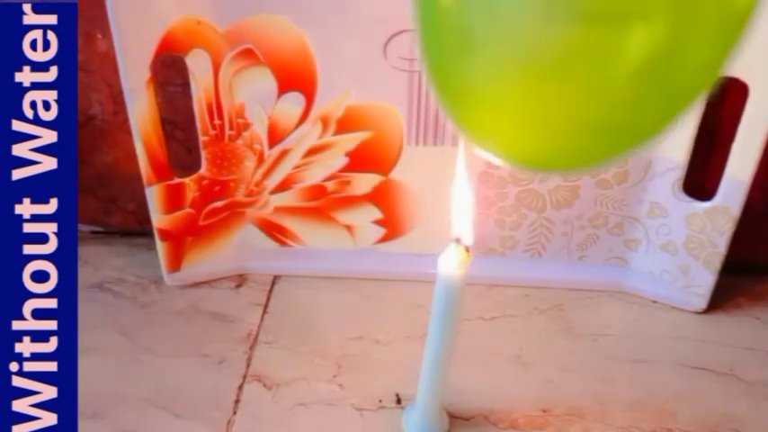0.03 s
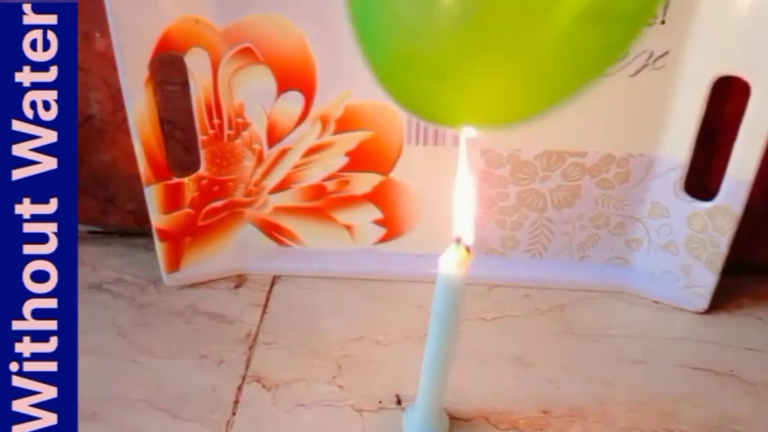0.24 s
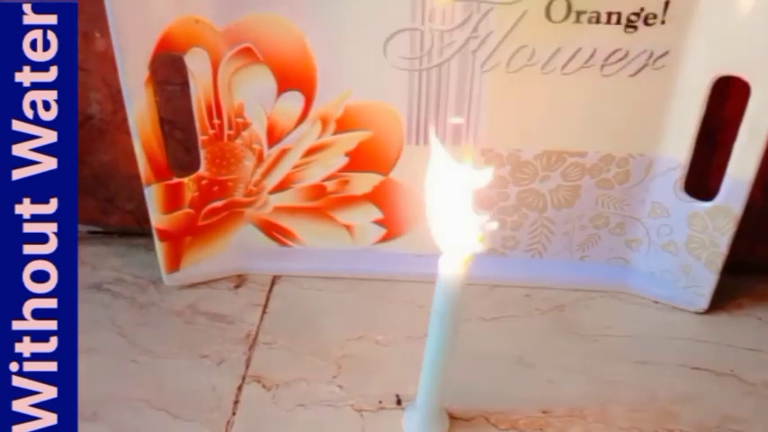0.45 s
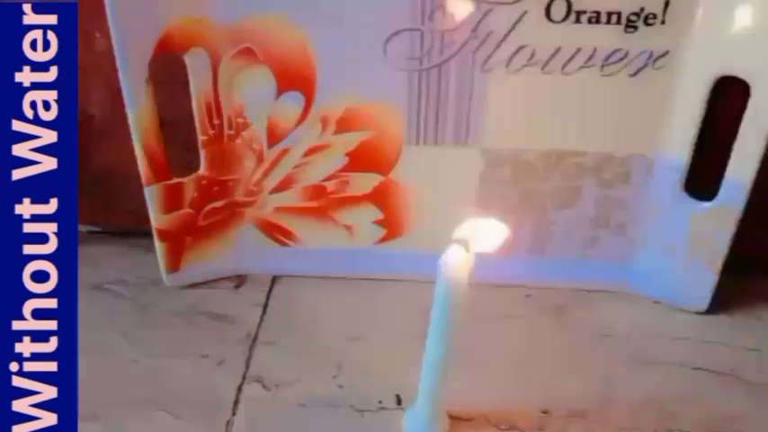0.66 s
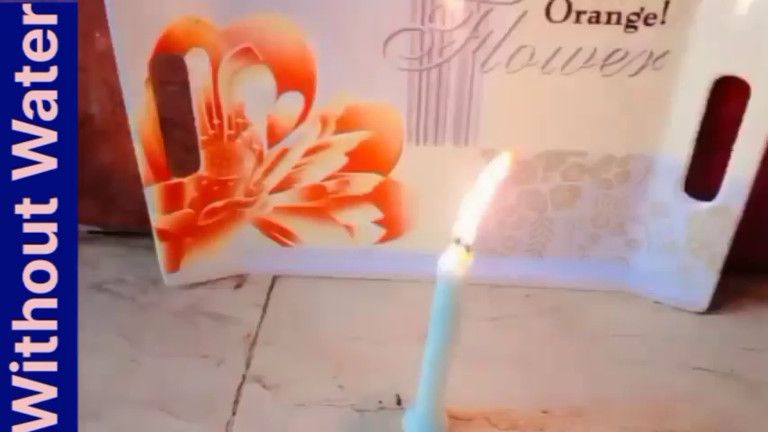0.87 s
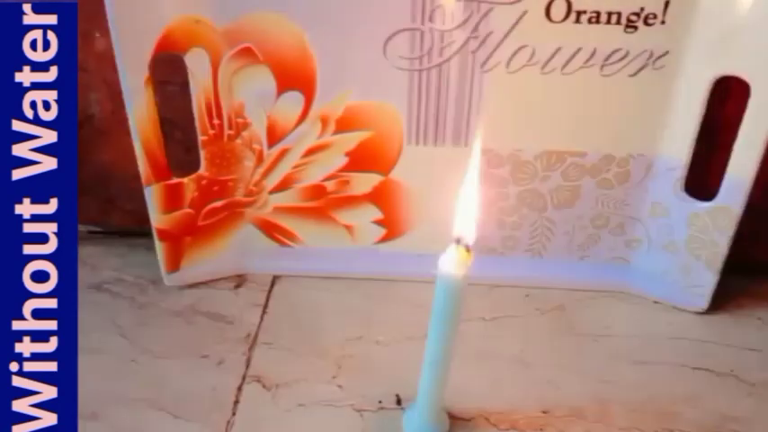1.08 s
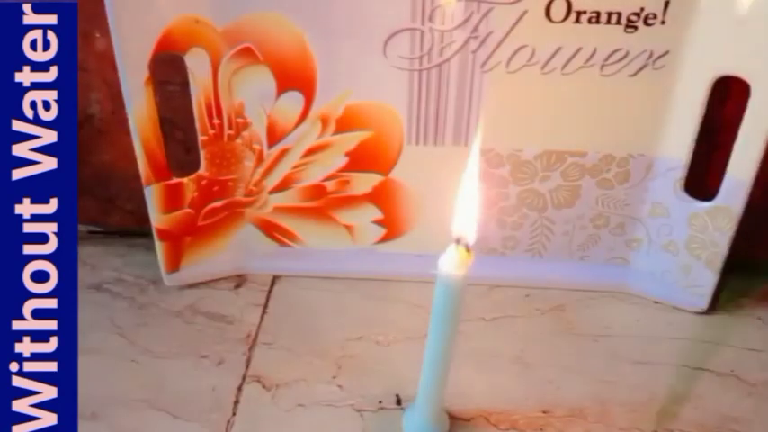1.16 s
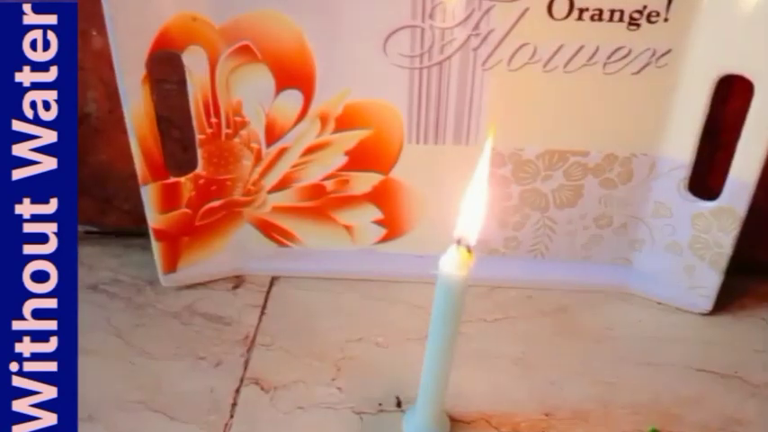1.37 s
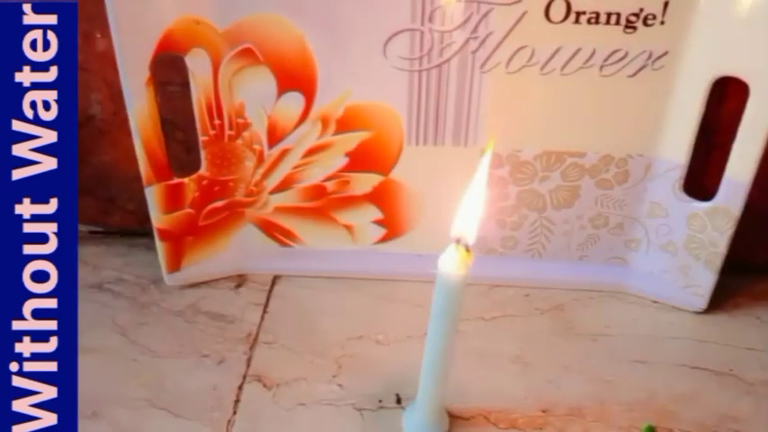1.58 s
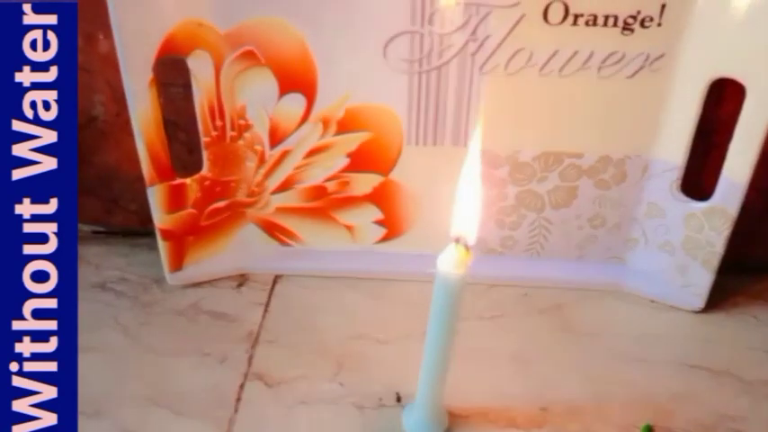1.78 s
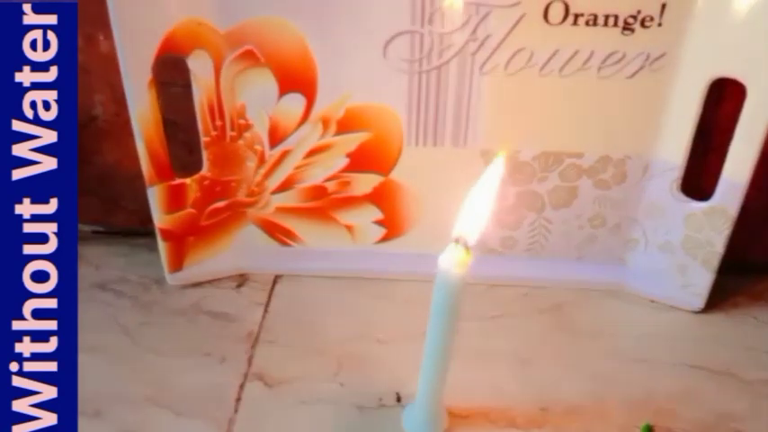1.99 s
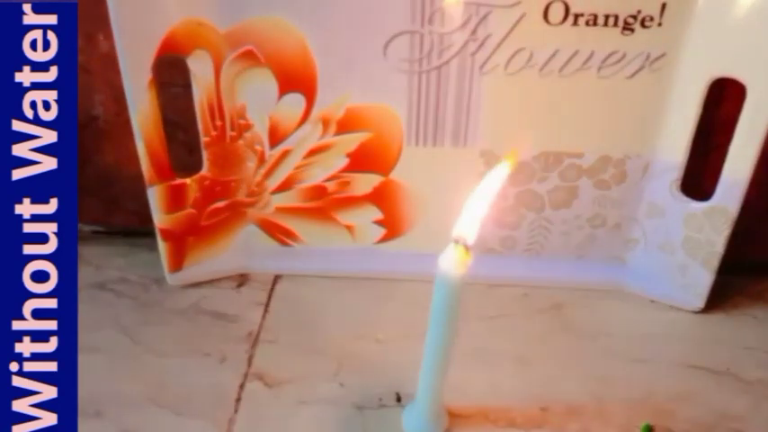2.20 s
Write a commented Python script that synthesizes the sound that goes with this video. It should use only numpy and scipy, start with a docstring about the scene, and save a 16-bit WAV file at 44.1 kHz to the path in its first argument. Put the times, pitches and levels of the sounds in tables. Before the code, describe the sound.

A balloon bursts with one loud, sharp bang in a hard-walled room with low humming noise.

```python
"""A balloon bursts over a candle, close to a small camera microphone in a hard-walled room.
The bang is a pressure pulse, tearing noise and a damped thump, with echoes off the table and tray.
Shaped noise and decaying tones ring round the room; gain control, limiter and overload flatten the bang.
Behind it, a low noise rush, unsteady hum tones and thin hiss stay held down, then swell back after
more than a second. A few faint ticks, short bands of noise, are heard."""
import sys
import numpy as np
from scipy import signal
from scipy.fft import rfft, irfft
from scipy.io import wavfile
from scipy.ndimage import uniform_filter1d

SR = 44100
rng = np.random.default_rng(int(sys.argv[2]) if len(sys.argv) > 2 else 0)


def dump_mix(stems):
    """Bounce the given channels to the path in sys.argv[1] as a 16-bit WAV at rate SR."""
    frames = np.atleast_2d(stems).T  # one column per channel
    limited = np.clip(frames, -1, 1)  # hard clip at full scale
    pcm = np.round(limited * 32767).astype(np.int16)
    wavfile.write(sys.argv[1], SR, pcm)


N = 99225
T = np.arange(N) / SR  # t/s
HZ = np.fft.rfftfreq(N, 1 / SR)  # f/Hz

# All source levels are those ahead of the microphone's gain control and limiter.
# Colour of the room's rush: f/Hz, relative density level/dB
AIR_COLOUR = [(20, -7.5), (45, -1.5), (90, -0.5), (170, -4), (250, -2.5), (320, -8), (400, -7.5),
              (500, -16.5), (660, -18.5), (880, -17.5), (1300, -22.5), (2100, -24.5), (2700, -30.5),
              (3600, -33.5), (5500, -40.5), (8400, -52.5), (13500, -54), (16000, -56)]
AIR_DB, AIR_DB_PER_S = -30.5, -2.5  # level at the start, and its slow easing
AIR_WAVER_DB, AIR_WAVER_HZ = 0.75, 14  # rms depth and upper edge of the level waver
HISS_DB = -73
# Hum of a fan or appliance: f/Hz, level/dB, unsteady amplitude share [0-1]
HUM_TONES = [(77.4, -46, 0), (150.2, -43.5, .4), (232, -43, 0.9), (244.4, -47, 0.8), (408.2, -45.5, 0.3),
             (867, -59.5, .8), (2155, -65, 1)]
HUM_WAVER_HZ = 14  # spread of each unsteady tone
# Faint ticks and rustles: peak t/s, level/dB, rise t/s, decay t/s, centre f/Hz, width [octaves]
FAINT_TICKS = [(0.424, -50.5, 0.0026, 0.013, 6300, 0.33), (0.462, -58.5, 0.0078, 0.014, 6800, 0.28),
               (1.276, -55, .003, .004, 12500, .6), (1.310, -47, 0.0054, 0.014, 12870, 1),
               (2.047, -55, 0.0015, 0.009, 6800, .8), (2.162, -60, 0.0016, .005, 14100, .4)]

# Colour of the reverberation before its decay is applied: f/Hz, relative density level/dB
TAIL_COLOUR = [(50, -18.5), (100, -13), (200, -12), (400, -6), (550, -8), (800, -7.5), (1300, -11),
               (2000, -13.5), (4000, -16.5), (6000, -22.5), (8700, -33), (13500, -31), (16000, -38.5)]
# Decay of the reverberation: f/Hz, time to fall 60 dB t/s
ROOM_DECAY = [(100, 1.0), (300, 0.76), (900, 0.75), (3000, 0.74), (5500, 0.69), (8000, .58), (14000, 0.42)]
TAIL_DB, TAIL_AT_S = -14, 0.17  # tail level, and the time after the pop at which it holds
BUILD_S, MODE_BUILD_S = .002, 0.01  # onset times of the reflections and of the resonances
# Early reflections: peak delay t/s, level/dB, rise t/s, decay t/s, centre f/Hz, width [octaves]
REFLECTION_CLUSTERS = [(0.024, -6, 0.029, 0.054, 1000, 0.51), (0.0089, -4.5, 0.028, 0.023, 2450, 0.84),
                       (.068, -8.5, .01, .028, 4100, .55), (0.05, -17, 0.0534, 0.04, 13500, 0.26),
                       (.073, -0.5, .003, 0.016, 1100, .7), (.05, -4.5, .003, .007, 420, 0.76)]
# Room resonances that outlast the bang: f/Hz, level/dB, time to fall 60 dB t/s
ROOM_MODES = [(109, -10.5, 0.9), (167.3, -14, .9), (217.3, -8, 0.57), (282.7, -12.5, 0.74),
              (390, -12.5, 0.67), (523.4, -20, 1.51), (627.7, -11.5, 0.47), (721, -7.5, 0.44),
              (786, -14.5, 0.71), (857, -11, 0.55), (948, -27, 1.6), (1027, -17, 0.42), (1160, -5.5, 0.29)]

POP_S = 0.529
PULSE_S, PULSE_DB = .0007, 20.5  # released air: time to the pressure's zero crossing, and drive level
# Colour of the tearing rubber: f/Hz, relative density level/dB
RIP_COLOUR = [(300, -17.5), (2000, 3), (6800, -5), (9000, -15), (11300, -5), (14400, 0), (16000, 0)]
RIP_DB, RIP_S = 8.5, .002  # tearing: starting level and decay time
THUMP_HZ, THUMP_DB, THUMP_S = 275.6, 4.5, .004  # freed ball of air: pitch, level, decay time
# Echoes off the table and the tray: delay t/s, level/dB relative to the direct sound
NEAR_ECHOES = [(.0031, -2), (.0043, -3.5), (.006, -12)]

LOW_CUT_HZ, EDGE_HZ = 30, 16000  # lower and upper limits of the recorded band
TRIGGER_DB, TRIGGER_WINDOW_S = -8, .012  # level that trips the gain control
DUCK_DB, RETURN_S, RETURN_CURVE = 12, 1.434, 6.66  # steep curve: a long hold, then a late return
LIMIT_DB, LIMIT_WINDOW_S, LIMIT_LAG_S = -14, 0.011, .0025
CEILING_DB = 2  # soft overload
FADE_S = .004


def amp(db):
    """Decibels to gain."""
    return 10 ** (np.asarray(db) / 20)


def unit(x):
    """Scales to rms 1."""
    return x / np.sqrt(np.mean(x ** 2) + 1e-20)


def read(points, hz):
    """Reads a table on a log-frequency axis."""
    f, value = np.transpose(points)
    return np.interp(np.log(hz + 1), np.log(f + 1), value)


def noise(gain):
    """Noise of rms 1 with the given gain at each frequency."""
    white = rng.standard_normal(N)
    return unit(irfft(rfft(white) * gain, N))


def delayed(x, s):
    """The sound, starting s seconds later."""
    silence = np.zeros(max(round(s * SR), 0))
    return np.concatenate([silence, x])[:N]


def puff(s, db, rise, decay, hz, octaves):
    """A band of noise that swells exponentially to its peak at time s and dies away."""
    shape = np.exp(-np.maximum((s - T) / rise, (T - s) / decay))
    octaves_off = np.log2((HZ + 1) / hz)
    band = np.exp(-.5 * (octaves_off / octaves) ** 2)
    return amp(db) * shape * noise(band)


def hum_line(hz, db, unsteady):
    """One hum tone: a steady sine and a wavering narrow noise band, sharing the power."""
    steady = unit(np.sin(2 * np.pi * (hz * T + rng.random())))
    wavering = noise(np.exp(-((HZ - hz) / HUM_WAVER_HZ) ** 2))
    return amp(db) * (np.sqrt(1 - unsteady ** 2) * steady + unsteady * wavering)


def room_noise():
    """The room's background: a low rush, wavering and slowly easing, with hum tones and thin hiss."""
    waver = noise(1 / (1 + (HZ / AIR_WAVER_HZ) ** 4))
    rush_db = AIR_DB + AIR_WAVER_DB * waver + AIR_DB_PER_S * T
    rush = amp(rush_db) * noise(amp(read(AIR_COLOUR, HZ)))
    hum = sum(hum_line(*row) for row in HUM_TONES)
    return rush + hum + amp(HISS_DB) * noise(1)


def ticks():
    """Short, bright ticks and rustles, each a brief band of noise."""
    return sum(puff(*row) for row in FAINT_TICKS)


def room_modes():
    """Room resonances: sines that build up quickly and decay exponentially."""
    ring = np.zeros(N)
    for hz, db, t60 in ROOM_MODES:
        decay = np.exp(-np.log(1000) * T / t60)
        ring += amp(db) * decay * np.sin(2 * np.pi * (hz * T + rng.random()))
    return ring * (1 - np.exp(-T / MODE_BUILD_S))


def reverberation():
    """Early clusters and dense reflections that die away, the treble first, over ringing room modes."""
    hz, t, bands = signal.stft(noise(amp(read(TAIL_COLOUR, HZ))), SR, nperseg=512)
    t60 = read(ROOM_DECAY, hz)[:, None]
    bands = bands * amp(-60 * (t - TAIL_AT_S) / t60)
    tail = amp(TAIL_DB) * signal.istft(bands, SR)[1][:N]
    clusters = sum(puff(*row) for row in REFLECTION_CLUSTERS)
    return (tail + clusters) * (1 - np.exp(-T / BUILD_S)) + room_modes()


def burst():
    """The skin rips and frees a pressure pulse with a short thump; nearby surfaces echo pulse and rip."""
    u = T / PULSE_S
    # a rounded onset, then overpressure that turns to suction
    pulse = amp(PULSE_DB) * (1 - u) * np.exp(-u) * (1 - np.exp(-4 * u))
    rip = amp(RIP_DB) * noise(amp(read(RIP_COLOUR, HZ))) * np.exp(-T / RIP_S)
    thump = amp(THUMP_DB) * np.sin(2 * np.pi * THUMP_HZ * T) * np.exp(-T / THUMP_S)
    direct = pulse + rip
    echoes = sum(amp(db) * delayed(direct, s) for s, db in NEAR_ECHOES)
    return direct + thump + echoes


def scene():
    """The pop and its reverberation in the humming room, with the ticks."""
    pop = delayed(burst() + reverberation(), POP_S)
    return (room_noise() + ticks() + pop)[None]


def level_db(x, window_s):
    """Short-time level over a centred window."""
    power = uniform_filter1d(x ** 2, max(int(window_s * SR), 1))
    return 10 * np.log10(abs(power) + 1e-12)


def gain_control(x):
    """Turns the sound down while it is loud, then lets the gain come back along a steep late curve."""
    loud = level_db(x, TRIGGER_WINDOW_S) > TRIGGER_DB
    last_loud = np.maximum.accumulate(np.where(loud, T, -10))  # -10 s: not tripped yet
    returned = np.minimum((T - last_loud) / RETURN_S, 1) ** RETURN_CURVE
    duck_db = DUCK_DB * (1 - returned)
    return x * amp(-uniform_filter1d(duck_db, size=64))


def limiter(x):
    """Takes off the short-time level above the limit, starting a moment before the loud sound arrives."""
    excess_db = np.maximum(level_db(x, LIMIT_WINDOW_S) - LIMIT_DB, 0)
    return x * amp(-delayed(excess_db, LIMIT_LAG_S))


def record(dry):
    """The camera microphone: low cut, gain control, limiter, soft overload, end fades and treble cut."""
    low_cut = signal.butter(2, LOW_CUT_HZ, "highpass", fs=SR, output="sos")
    x = signal.sosfilt(low_cut, dry[0])
    x = limiter(gain_control(x))
    x = amp(CEILING_DB) * np.tanh(x / amp(CEILING_DB))
    x = x * np.minimum(np.minimum(T, T[::-1]) / FADE_S, 1)
    treble_cut = signal.firwin(401, EDGE_HZ, window=("kaiser", 8), fs=SR)
    return signal.oaconvolve(x, treble_cut, "same")[None]


dry = scene()
out = record(dry)
dump_mix(out)
```